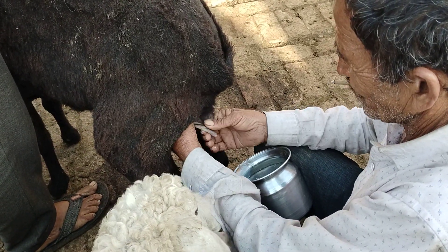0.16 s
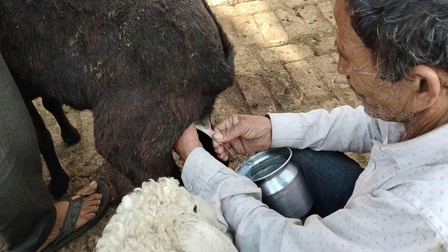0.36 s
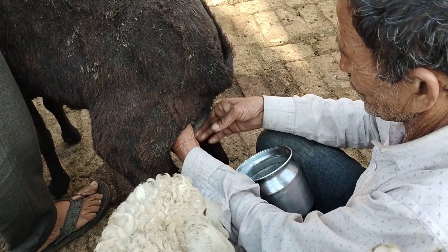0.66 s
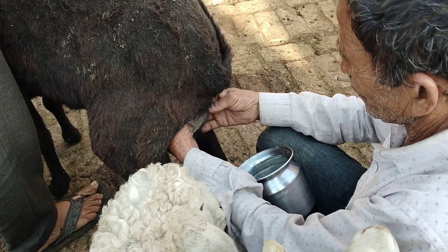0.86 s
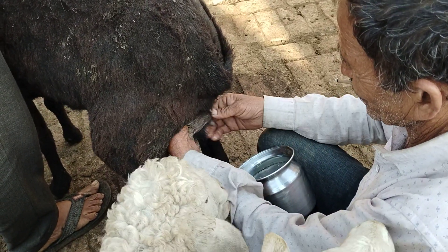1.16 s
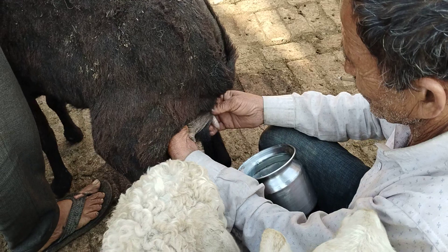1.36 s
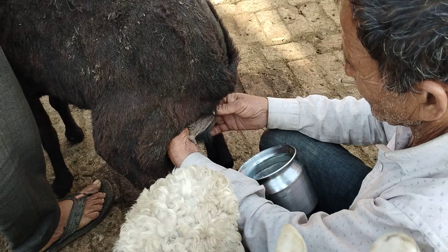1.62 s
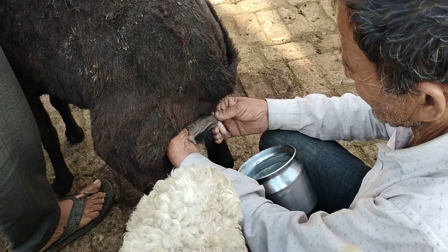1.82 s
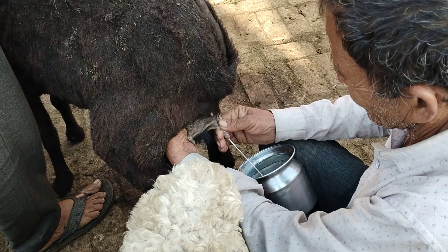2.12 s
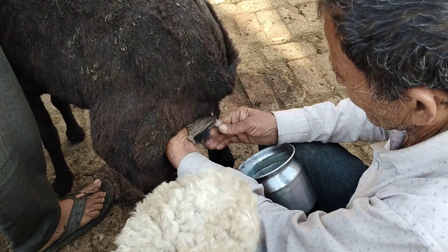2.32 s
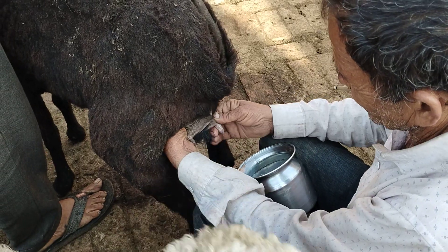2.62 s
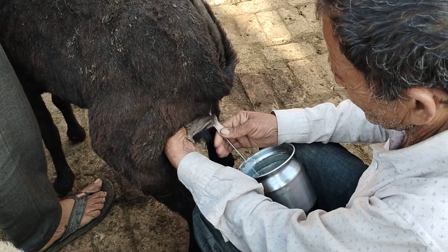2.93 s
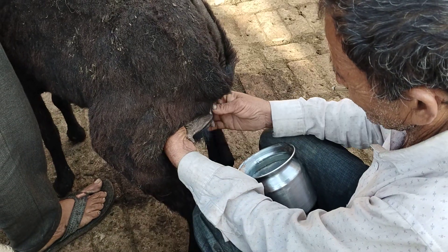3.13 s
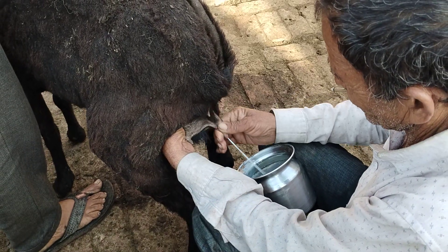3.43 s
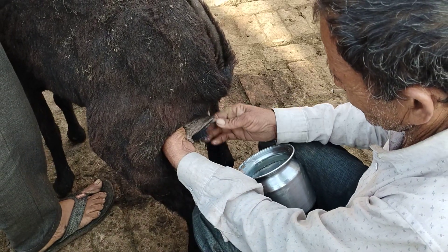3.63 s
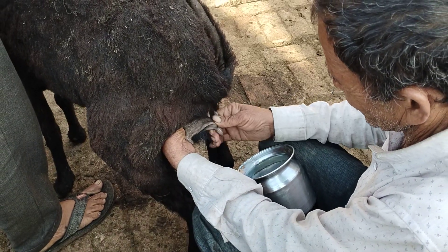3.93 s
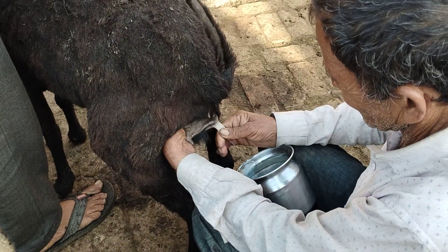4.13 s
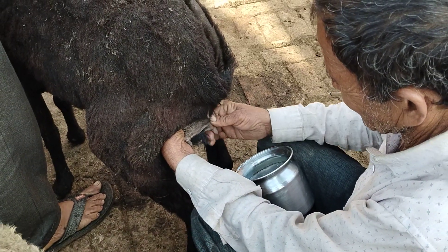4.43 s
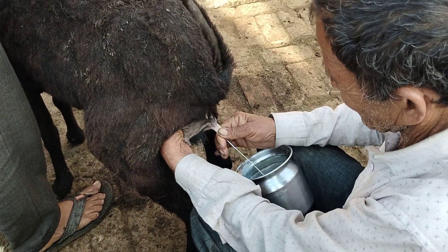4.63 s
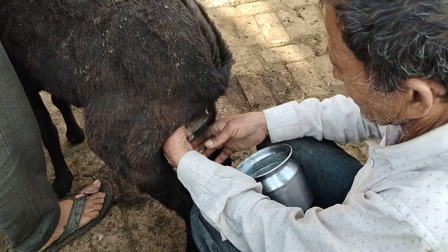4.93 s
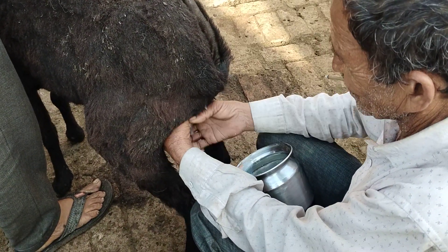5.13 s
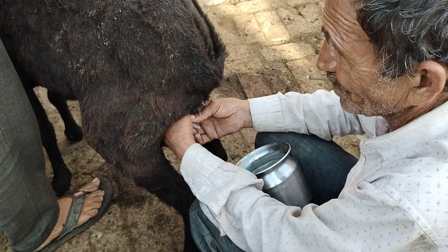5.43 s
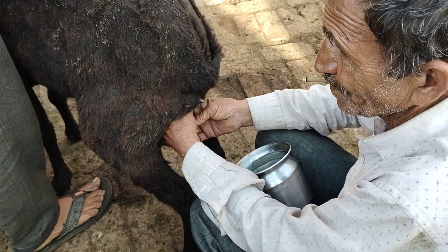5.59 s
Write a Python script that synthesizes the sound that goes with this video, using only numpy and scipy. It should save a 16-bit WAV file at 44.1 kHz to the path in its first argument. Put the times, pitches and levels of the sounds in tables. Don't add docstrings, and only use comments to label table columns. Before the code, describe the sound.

A quiet farmyard under uneven, buffeting breeze. A dry bird rattle, thin whistles and soft distant dove coos come first, among cloth movements and tiny knocks. Milk then spurts into a metal can with short hissing pings. A nearby sheep on the left murmurs with mouth shut and bursts into a single hoarse, nasal, wavering bleat with a short wall echo. Dove, faint chirp and rustling finish the scene.

```python
import sys
import numpy as np
from scipy import signal
from scipy.fft import rfft, irfft, next_fast_len
from scipy.io import wavfile

SR = 44100
rng = np.random.default_rng(int(sys.argv[2]) if len(sys.argv) > 2 else 0)


def volts_from_decibels(level):
    exponent = np.asarray(level, float) / 20
    return 10 ** exponent


def master_out(mix):
    frames = np.transpose(np.atleast_2d(mix))
    ceiling = np.clip(frames, -1, 1)
    pcm = np.round(ceiling * 32767).astype(np.int16)
    wavfile.write(sys.argv[1], SR, pcm)


N = 254012
T = np.arange(N) / SR
F = np.maximum(np.fft.rfftfreq(next_fast_len(N), 1 / SR), 1)

# (frequency [Hz], left lead [rad])
PORT_PHASE = [(60, -.1), (200, -.4), (400, -1.1), (800, -2), (1400, -2.6), (3000, -2), (15000, -1.6)]
# (frequency [Hz], level [dB])
MIC_COLOUR = [(6500, -2), (7800, 3), (8700, 0), (9500, -15), (10300, -10), (12000, -9.5)]

VOICE = slice(int(4.08 * SR), int(5.07 * SR))
OPENS_S, ATTACK_S = 4.36, 0.013


def on_log(table):
    hz, value = np.transpose(table)
    return np.interp(np.log(F), np.log(hz), value)


def columns(table, t=T):
    s, *rest = np.transpose(table)
    return [np.interp(t, s, c) for c in rest]


def bell(t, s, half):
    return np.exp(-((t - s) / half) ** 2)


def shape(x, gain):
    return irfft(rfft(x, next_fast_len(N)) * gain, next_fast_len(N))[:N]


def unit(x, t0=0, t1=6):
    return x / np.std(x[int(t0 * SR):int(t1 * SR)])


def modes(table, f=F):
    total = 0
    for k, (hz, width, db) in enumerate(table):
        detune = (f / hz - hz / f) * hz / width
        total = total + (-1) ** k * volts_from_decibels(db) / (1 + 1j * detune) ** 2
    return total


def band(hz, width):
    return unit(shape(rng.standard_normal(N), modes([(hz, width, 0)])))


def walk(rate):
    return unit(shape(rng.standard_normal(N), (F > 1) / (1 + (F / rate) ** 2)))


def patchy(hz, width):
    total = 0
    for f in hz + width * np.linspace(-.4, .4, 4):
        flicker = volts_from_decibels(3 * walk(200) + 3 * walk(30))
        total = total + flicker * np.array([band(f, width / 3), band(f, width / 3)])
    return total / 2


def ports(mid, pan_db, phase):
    right = volts_from_decibels(-pan_db) * np.exp(-1j * phase)
    return np.array([shape(mid, 2 / (1 + right)), shape(mid, 2 * right / (1 + right))])


def panned(mid, pan_db):
    return mid * volts_from_decibels(np.array([[pan_db / 2], [-pan_db / 2]])) / np.cosh(pan_db / 17.4)


def echo(x, t60, db):
    t = np.arange(int(SR * .6)) / SR
    tail = rng.standard_normal((2, len(t))) * 1000 ** (-t / t60) * (t > .004)
    tail = tail / np.sqrt(np.sum(tail[0] ** 2))
    return x + volts_from_decibels(db) * signal.fftconvolve(x, tail, axes=1)[:, :N]


def add(out, s, grain):
    i = int(s * SR)
    out[:, i:i + grain.shape[1]] += grain[:, :N - i]


def ring(hz, t60):
    t = np.arange(int(SR * .04)) / SR
    return np.sin(2 * np.pi * hz * t) * 1000 ** (-t / t60) * np.minimum(1, t / 0.00043)


def whistles(notes, rough, pan_db, glide, peak, rise_db, fall_db, droop_hz=0, edge_s=0.013):
    out = np.zeros((2, N))
    flutter = volts_from_decibels(rough * walk(51))
    for s, length, from_hz, to_hz, db in notes:
        t = np.arange(0, length, 1 / SR)
        settled = (1 - np.exp(-t / length / glide)) / (1 - np.exp(-1 / glide))
        hz = from_hz + (to_hz - from_hz) * settled - droop_hz * (t / length) ** 5
        level = volts_from_decibels(db - np.interp(t / length, [0, peak, 1], [rise_db, 0, fall_db]))
        edge = np.minimum(1, np.minimum(t, t[-1] - t) / edge_s)
        tone = np.sqrt(2) * np.sin(2 * np.pi * np.cumsum(hz) / SR)
        add(out, s, panned(edge * level * tone, pan_db))
    return out * flutter


def yard():
    # (frequency [Hz], density [dB per Hz])
    floor_colour = [(15, -22), (25, -1), (59, -6), (96, -5.5), (148, -11.5), (421, -40), (598, -23.5),
                    (1170, -25), (2920, -26.5), (4500, -37), (7910, -35), (8810, -39.5), (9550, -40),
                    (11200, -44), (15500, -43.5)]
    shared = np.clip(on_log([(60, 1.0), (300, 0.8), (1400, 0.04), (4000, 0.09)]), 0, 1)
    right_gain = volts_from_decibels(-on_log([(100, 1.3), (1000, 3.5), (2500, 9.8), (5000, 5.3)]))
    colour = volts_from_decibels(on_log(floor_colour) - on_log(MIC_COLOUR))
    turn = np.exp(-1j * on_log(PORT_PHASE))
    edges_hz = [0, 150, 400, 900, 1800, 3000, 4500, 7000, SR]
    out = 0
    for lo, hi in zip(edges_hz[:-1], edges_hz[1:]):
        part = colour * (F >= lo) * (F < hi)
        a, b = rng.standard_normal((2, N))
        right = shape(a, part * np.sqrt(shared) * turn) + shape(b, part * np.sqrt(1 - shared))
        flicker = volts_from_decibels(.9 * walk(2) + .9 * walk(15))
        out = out + flicker * np.array([shape(a, part), shape(right, right_gain)])
    return volts_from_decibels(-51.5) * out / np.std(out.mean(axis=0))


def breeze():
    # (time [s], level [dB])
    gusts = [(0, -31.5), (.18, -113), (.5, -48), (1.28, -36.5), (1.5, -86), (1.8, -38), (2.1, -36),
             (2.42, -45), (2.7, -41.5), (3.1, -44), (3.4, -48), (3.7, -44.5), (4.25, -44), (4.7, -49.5),
             (5.05, -48.5), (5.4, -40.5), (5.76, -54)]
    # (time [s], level [dB], half length [s])
    upper_swells = [(0.181, -40.5, 0.077), (0.334, -47, .05), (0.414, -47.5, 0.045), (2.69, -60, 0.066),
                    (0.554, -48.5, 0.16), (1.13, -47.5, 0.15), (3.114, -58.5, 0.14), (5.428, -46.5, 0.072),
                    (5.7, -60.5, 0.15)]
    # (time [s], level [dB], frequency [Hz], half length [s])
    port_booms = [(0.47, -43, 80.3, 0.15), (0.625, -37.5, 87, 0.026), (0.892, -32.5, 112.3, 0.062),
                  (1.216, -41.5, 88.4, 0.21), (1.435, -36, 66, 0.031), (2.046, -28.5, 71.1, 0.098),
                  (2.239, -32, 71, 0.024), (2.39, -39, 62.1, 0.086), (3.067, -37, 66, 0.045),
                  (3.516, -39, 114.7, 0.059), (3.724, -42, 50, 0.088), (6.2, -41, 60, 0.029),
                  (5.747, -40.5, 61, 0.041), (1.25, -45.5, 190, 0.078), (2.4, -44.5, 140, 0.069),
                  (0.101, -43.5, 200, .015), (0.149, -40.5, 230, .02), (.2, -40, 190, 0.014),
                  (0.313, -41.5, 170, 0.016), (5.64, -52, 262, 0.054), (5.595, -50.5, 280, .012),
                  (5.445, -47.5, 310, 0.018), (0.85, -39, 73, .012), (.01, -39.5, 92, 0.017),
                  (5.345, -49, 280, .01)]
    upper = volts_from_decibels(-52.5 - 0.26 * T) + sum(volts_from_decibels(db) * bell(T, s, half) for s, db, half in upper_swells)
    rumble = 0.72 * volts_from_decibels(columns(gusts)[0]) * band(83.4, 47.6)
    rumble = rumble + upper * volts_from_decibels(2.0 * walk(5.2)) * (band(129.0, 130) + 0.18 * band(228, 344))
    drift = 0.81 * walk(7.8)
    for s, db, hz, half in port_booms:
        rumble = rumble + volts_from_decibels(db) * np.sqrt(2) * bell(T, s, half) * np.sin(2 * np.pi * hz * T + drift)
    return ports(rumble, 0 * F + .5, on_log(PORT_PHASE))


def rustle():
    # (time [s], rise [s], fall [s], level [dB], body relative to level [dB])
    hiss_bursts = [(.56, 0.14, 0.066, -60, -5), (.85, 0.11, 0.22, -74.5, 7.5),
                   (1.12, 0.036, 0.066, -69, -9), (1.43, 0.018, 0.074, -75, 5),
                   (1.9, 0.066, 0.068, -70, -25), (2.21, 0.017, 0.044, -58, -30),
                   (2.33, 0.081, 0.097, -61.5, 9), (2.62, 0.11, 0.23, -71, -9), (5.08, .05, 0.09, -72, 3),
                   (2.99, 0.023, 0.07, -57, -5.5), (3.13, 0.023, 0.011, -67.5, 10.5),
                   (3.619, 0.02, 0.19, -57.5, 5.5), (4.24, 0.032, 0.058, -59, 5.5),
                   (5.33, 0.096, 0.17, -65.5, 6.5)]
    grain = volts_from_decibels(5.2 * walk(60))
    port, top, body = (patchy(hz, w) for hz, w in [(7840, 8100), (12100, 7800), (4220, 5270)])
    levels = np.zeros((3, N))
    for s, rise, fall, db, body_db in hiss_bursts:
        top_db = 1.5 + 0.51 * min(body_db, 0)
        swell = bell(T, s, np.where(T < s, rise, fall))
        levels += volts_from_decibels(db + np.array([[0], [top_db], [body_db]])) * swell
    out = levels[0] * port + levels[1] * top + levels[2] * body
    rim = band(5540, 220) + 1.1 * band(6170, 300) + 0.4 * band(4320, 300) + 0.48 * band(8200, 350)
    jet = volts_from_decibels(-54.0) * bell(T, 2.215, 0.028) * rim
    # (time [s], level [dB], half length [s])
    drags = [(.4, -56.5, 0.19), (.8, -57, 0.15), (2.35, -74, 0.075), (3.72, -54.5, 0.13),
             (5.47, -52, 0.14)]
    drag = sum(volts_from_decibels(db) * bell(T, s, half) for s, db, half in drags)
    return out + grain * jet + drag * np.array([band(2100, 2400), 0.13 * band(1400, 1600)])


def dove():
    # (time [s], length [s], from [Hz], to [Hz], level [dB])
    opening_coo = [
        (0.555, 0.11, 549.5, 568.5, -48.5),
    ]
    later_coos = [
        (0.76, 0.45, 559.4, 521, -49.5),
        (1.54, 0.16, 566, 500, -53),
        (4.87, 0.45, 570, 540, -48),
        (5.675, 0.12, 551, 490, -60),
    ]
    rising = whistles(opening_coo, rough=0.65, pan_db=-7.5, glide=9.5, peak=0.52, rise_db=11, fall_db=7.2)
    falling = whistles(later_coos, rough=0.63, pan_db=-7.0, glide=8.1, peak=0.17, rise_db=11.7, fall_db=26)
    return rising + falling


def chirps():
    # (time [s], level [dB], top [Hz], length [s])
    chirp_notes = [
        (0.355, -51.5, 6300, 0.026),
        (0.467, -52.5, 4980, 0.023),
        (2.512, -55.5, 5260, 0.03),
        (2.63, -55, 4590, 0.027),
        (5.153, -58, 5200, 0.031),
    ]
    # (time [s], length [s], level [dB])
    buzz_notes = [
        (0.45, 0.14, -70),
        (1.883, 0.24, -71.5),
        (4.187, 0.21, -69),
    ]
    upper_hz, lower_hz = 4200, 3530
    out = np.zeros((2, N))
    for s, db, top_hz, length in chirp_notes:
        t = np.arange(0, length, 1 / SR)
        upper = np.interp(t, [0, .009, .019, length], [2800, top_hz, upper_hz * 1.02, upper_hz])
        lower = np.interp(t, [0, .008, length], [2800, lower_hz, lower_hz * 1.19])
        a_level = np.interp(t, [0, .012, .025, length], [0.74, 0.45, 2.1, 5.1])
        b_level = np.interp(t, [0, .004, .013, .022], [0, 1.58, 0.98, 0])
        a = a_level * np.sin(2 * np.pi * np.cumsum(upper) / SR)
        b = b_level * np.sin(2 * np.pi * np.cumsum(lower) / SR)
        add(out, s, panned(volts_from_decibels(db) * (a + b) * np.minimum(1, (t[-1] - t) / 0.0036), 10.2))
    arch = 0
    for s, length, db in buzz_notes:
        arch = arch + volts_from_decibels(db) * np.sin(np.pi * np.clip((T - s) / length, 0, 1)) ** 0.53
    return out + panned(arch * (band(6060, 760) + 0.65 * band(5400, 570)), 2.4)


def birdsong():
    # (time [s], length [s], from [Hz], to [Hz], level [dB])
    slides = [
        (0.34, 0.18, 4930, 5630, -60.5),
        (1.795, 0.16, 4930, 5680, -60.5),
        (4.075, 0.19, 5010, 5660, -58.5),
    ]
    pipes = [
        (1.285, 0.23, 1704, 2384, -59),
    ]
    upper_pipes = [
        (1.305, .2, 2206, 2617, -57),
        (1.32, 0.17, 2780, 2910, -72),
    ]
    peeps = [(0.0, 0.04, 4300, 4330, -78), (0.0, 0.04, 3080, 3120, -79), (0.09, .05, 3480, 3330, -73),
             (0.095, 0.055, 3150, 3300, -73), (.865, 0.06, 3960, 3970, -75), (1.19, 0.09, 3060, 2650, -81),
             (3.522, 0.03, 2950, 3450, -68), (3.56, .025, 3350, 3600, -70), (3.82, .03, 3400, 3500, -77),
             (5.03, .1, 2600, 2750, -70), (5.71, 0.05, 3930, 3750, -75)]
    late_pipes = [
        (3.55, .145, 1700, 2250, -63.5),
        (3.545, 0.089, 2550, 3010, -70),
        (3.553, .13, 2050, 2590, -63),
    ]
    late_ends = [
        (3.705, .105, 2250, 2270, -63),
        (3.68, .1, 2630, 2470, -61.5),
    ]
    song = whistles(slides, rough=1.5, pan_db=4.9, glide=.5, peak=0.62, rise_db=8.6, fall_db=6.1)
    song += whistles(pipes, rough=3.4, pan_db=9.3, glide=0.21, peak=0.8, rise_db=11.4, fall_db=7.2)
    song += whistles(upper_pipes, rough=1.4, pan_db=11.7, glide=.12, peak=0.55, rise_db=11, fall_db=4,
                     droop_hz=220)
    song += whistles(peeps, rough=4.0, pan_db=17.0, glide=0.76, peak=0.2, rise_db=2.4, fall_db=3.4)
    song += whistles(late_pipes, rough=1.6, pan_db=7.4, glide=.13, peak=0.43, rise_db=7.4, fall_db=0.6,
                     edge_s=.008)
    song += whistles(late_ends, rough=3.0, pan_db=7.7, glide=3.5, peak=.4, rise_db=1.5, fall_db=4.4,
                     edge_s=0.0074)
    return song + chirps()


def rattle():
    # (time [s], peak [dB])
    rattle_pulses = [(0.133, -52.5), (0.16, -55.5), (0.2441, -46), (0.303, -52), (0.325, -46.5),
                     (0.347, -41.5), (0.381, -40), (0.401, -36), (0.4184, -40), (0.432, -45.5),
                     (0.4583, -36), (0.486, -40), (0.508, -35.5), (0.5278, -35.5), (0.586, -44.5),
                     (0.607, -50), (0.632, -47)]
    out = np.zeros((2, N))
    tunings = 1 + .03 * rng.standard_normal((len(rattle_pulses), 3))
    for (s, db), tune in zip(rattle_pulses, tunings):
        upper = volts_from_decibels(14 - 44 * s) * (ring(2330 * tune[1], .013) + .5 * ring(2750, .006))
        pulse = ring(1200 * tune[0], .013) + upper + .6 * ring(1600 * tune[2], .006)
        add(out, s - .002, panned(volts_from_decibels(db) * pulse, 7.0))
    return out


def knocks_and_ticks():
    # (time [s], peak [dB], frequency [Hz])
    dull_knocks = [(0.068, -49, 840), (.243, -60, 2630), (1.071, -51, 1950), (1.415, -49, 3020),
                   (2.999, -71, 2100), (1.137, -39, 2800), (1.14, -37, 1170), (1.143, -44.5, 3100),
                   (1.855, -47, 765), (1.954, -47, 800), (2.286, -52, 3500), (2.3, -60, 4200),
                   (2.331, -50, 1510), (2.345, -48, 3640), (2.362, -40.5, 765), (2.372, -55, 3440),
                   (2.39, -43.5, 1010), (2.43, -40.5, 900), (2.841, -45, 1160), (3.128, -51.5, 3020),
                   (5.337, -48, 333), (5.391, -46.5, 1120), (5.431, -51, 500), (5.405, -46, 1250),
                   (5.432, -49, 910), (5.47, -52, 620), (5.627, -54, 1900), (5.63, -52.5, 1000),
                   (3.692, -45, 4200), (3.693, -53, 3800), (2.968, -55, 4180), (3.135, -56, 3200),
                   (.1, -47.5, 800), (2.69, -55, 380), (3.32, -50, 320), (3.27, -54, 400), (.415, -57, 330),
                   (.19, -48, 600), (.31, -52, 700), (.525, -44, 420), (2.44, -48, 550)]
    bright_ticks = [(0.072, -53, 5740), (.002, -50.5, 6060), (5.752, -52, 2950), (0.164, -50.5, 11200),
                    (.176, -54, 9900), (.742, -57, 8540), (.91, -51.5, 8100), (1.048, -52, 11100),
                    (1.415, -49, 10800), (2.495, -54, 8500), (3.04, -49, 6500), (0.678, -43.5, 9100),
                    (1.1005, -35.5, 7480), (1.138, -47, 6800), (1.226, -49.5, 7600), (1.443, -47.5, 5300),
                    (2.176, -54, 5600), (2.209, -40.5, 7300), (2.2842, -42, 5730), (2.403, -40, 5470),
                    (2.854, -50.5, 7900), (2.9659, -40.5, 5700), (3.135, -52, 5300), (3.6013, -40, 7550),
                    (3.692, -43, 5170), (4.1, -50, 8540), (4.227, -42, 6030)]
    out = np.zeros((2, N))
    for s, db, hz in dull_knocks:
        add(out, s, panned(volts_from_decibels(db) * ring(hz, 0.013), 2.0))
    for s, db, hz in bright_ticks:
        crack = np.diff(rng.standard_normal((2, 1765))) * 1000 ** (-np.arange(1764) / SR / .02)
        add(out, s, volts_from_decibels(db) * (.5 * ring(hz, 0.0078) + 0.3 * crack))
    return out


def milk_can():
    # (time [s], length [s], from [Hz], to [Hz], level [dB])
    can_glides = [
        (2.262, 0.059, 1456, 1543, -52),
        (2.315, 0.06, 1497, 1388, -60),
        (3.6, 0.05, 1400, 1790, -58),
        (5.18, 0.041, 2650, 2530, -64),
    ]
    can_notes = [
        (2.992, .024, 2090, 2130, -46.5),
        (3.012, 0.038, 2110, 2140, -53),
        (3.05, .03, 2130, 2120, -71),
        (3.086, 0.018, 2080, 2110, -54),
        (3.032, 0.017, 1540, 1580, -53),
        (3.7, 0.02, 1560, 1000, -67),
        (3.085, 0.024, 1560, 1460, -56.5),
        (2.972, .018, 1650, 1780, -63),
    ]
    glides = whistles(can_glides, rough=2.5, pan_db=-1.3, glide=1.6, peak=0.62, rise_db=5, fall_db=7)
    return glides + whistles(can_notes, rough=1.3, pan_db=-1.4, glide=1.7, peak=0.44, rise_db=3.7,
                             fall_db=6.1, edge_s=0.0085)


def throat_quaver(t):
    # (time [s], pitch drop [share], level drop [dB], half length [s], lip drop [dB])
    slackenings = [
        (4.173, .1, 0, .022, 2),
        (4.422, 0.03216, 1.5, 0.01617, -3.5),
        (4.505, 0.056, 0, 0.019, -1.5),
        (4.586, 0.079, 2.5, 0.025, 4),
        (4.659, 0.077, 3, 0.01586, 1),
        (4.714, 0.039, 4, 0.00904, -3),
        (4.76, 0.0331, 2.5, 0.0182, -1.5),
        (4.837, 0.023, 1.5, 0.0197, -1.5),
        (4.901, 0.012, 2, .018, 0),
    ]
    pitch_drop, level_drop_db, lip_drop_db = 0, 0, 0
    for s, pitch, level, half, lip in slackenings:
        slack = bell(t, s, half)
        pitch_drop = pitch_drop + pitch * slack
        level_drop_db = level_drop_db + level * slack
        lip_drop_db = lip_drop_db + lip * slack
    return 1 - pitch_drop, volts_from_decibels(-level_drop_db), lip_drop_db


def glottis(t, pitch_share):
    # (time [s], pitch [Hz])
    bleat_pitch = [
        (4.08, 152.1),
        (4.2, 159.9),
        (4.32, 187.3),
        (4.39, 209.5),
        (4.47, 215.1),
        (4.62, 220),
        (4.7, 213.9),
        (4.92, 200.5),
        (4.97, 180.3),
    ]
    k = np.arange(1, 29)[:, None]
    hz = columns(bleat_pitch, t)[0] * pitch_share
    phase = 2 * np.pi * np.cumsum(hz * (1 + .003 * walk(60)[VOICE])) / SR
    wobble = np.array([walk(32)[VOICE] for _ in range(7)])[np.arange(28) % 7]
    waver_db = 1.8 * wobble * (k > 8) + .9 * wobble * (k > 3) + .5 * walk(110)[VOICE]
    tones = np.exp(1j * (k * phase - .2 * k ** 2 + .009 * k * wobble[::-1])) * volts_from_decibels(waver_db)
    creak = 0.13 * np.clip((t - 4.92) / ATTACK_S, 0, 1)
    tones = tones * (1 + creak * np.cos(phase / 2))
    harmonic_hz = (k * hz)[:, ::8]
    return phase, wobble, tones, harmonic_hz


def through(tones, response):
    gain = np.repeat(response, 8, axis=1)[:, :tones.shape[1]]
    power = np.median(np.sum(abs(response) ** 2, axis=0)) / 2
    return np.real(np.sum(tones * gain, axis=0)) / np.sqrt(power)


def air(gated, table):
    return unit(shape(gated, modes(table)), 4.96, 5.12)[VOICE]


def nose(t, phase, shut, first):
    # (time [s], half length [s], level [dB])
    octave_swells = [
        (4.6, 0.095, 12.4),
        (4.92, 0.098, 16.7),
    ]
    octave_db = -25.5 + 7.2 * shut + 4.3 * first
    octave_db = octave_db + sum(db * bell(t, s, half) for s, half, db in octave_swells)
    return np.sqrt(2) * (np.cos(phase) + volts_from_decibels(octave_db) * np.cos(2 * phase))


def cheek(t, tones, harmonic_hz, gated, hoarse):
    # (frequency [Hz], width [Hz], level [dB])
    cheek_modes = [(640, 315, 6), (812, 870, -3.5), (970, 434, 0.5)]
    widen = 0.915 + 0.33 * (t[::8] - OPENS_S)
    notch_hz, notch_width_hz = 428, 200
    detune = (harmonic_hz / notch_hz - notch_hz / harmonic_hz) * notch_hz / notch_width_hz
    notch = 1 - 1 / (1 + 1j * detune)
    voiced = through(tones, notch * modes(cheek_modes, harmonic_hz / widen))
    return voiced + 0.84 * hoarse * air(gated, cheek_modes)


def mouth(t, tones, harmonic_hz, gated, hoarse, lip_drop_db, lip_shift):
    # (frequency [Hz], width [Hz], level [dB])
    mouth_modes = [(1459, 280, -7), (1727, 154, 5.5)]
    lip_modes = [(2310, 388, 0.53), (2852, 210, -0.73)]
    teeth_modes = [(3336, 200, -14.5), (3728, 157, -12.5), (4660, 1900, -37), (5520, 520, -30.5)]
    slow = t[::8]
    gape = np.clip((slow - 4.91) / 0.05, 0, 1)
    stretch = 1.002 - .04 * bell(slow, 4.39, .03) + 0.12 * gape
    lip_gain = volts_from_decibels(-1.5 + 7.5 * gape - lip_drop_db[::8])
    teeth_gain = np.clip((slow - OPENS_S) / 0.049 + 0.35, 0, 1) * (1 + 0.34 * bell(slow, 4.73, 0.084))
    teeth = teeth_gain * modes(teeth_modes, harmonic_hz / np.sqrt(stretch))
    lower_lip = modes(lip_modes[:1], harmonic_hz / stretch)
    upper_lip = lip_shift[::8] * modes(lip_modes[1:], harmonic_hz / stretch)
    response = modes(mouth_modes, harmonic_hz) + teeth + lip_gain * (lower_lip - upper_lip)
    return through(tones, response) + hoarse * air(gated, mouth_modes + lip_modes + teeth_modes)


def sheep_breath(t, mouth_db, dip, phase, waver):
    gate = np.minimum((t - OPENS_S) / 0.059, (5.01 + 0.018 - t) / 0.04)
    blow = np.clip(gate, 0, 1) * volts_from_decibels(-49 + 0.25 * mouth_db)
    puff = blow * dip * volts_from_decibels(2.5) * (1 + .45 * np.cos(phase)) * volts_from_decibels(1.8 * waver)
    breath = np.zeros((2, N))
    for port, db in enumerate((1.5, -1.5)):
        grows = np.clip((T - OPENS_S) / 0.39, .3, 1)
        hiss = band(5350, 170) * 1.3 * grows * volts_from_decibels(1.2 * walk(9.2))
        hiss += band(5100, 3600) * 1.56 + band(6480, 2400)
        top = band(11300, 2600) + 0.42 * band(14000, 2500)
        hiss += top * volts_from_decibels(2.0 * db - 3.0 + 1.2 * walk(25))
        breath[port, VOICE] = volts_from_decibels(db) * puff * hiss[VOICE]
    return breath


def sheep():
    # (time [s], open mouth [dB])
    bleat_effort = [
        (4.33, -56.5),
        (4.36, -27.5),
        (4.385, -21.5),
        (4.54, -20),
        (4.62, -17.5),
        (4.74, -21.5),
        (4.87, -22.5),
        (4.965, -31.5),
        (5.015, -54),
    ]
    # (time [s], half length [s], nose [dB], grunt [dB])
    shut_hums = [
        (4.152, 0.029, -30, -48),
        (4.196, 0.012, -37, -58),
        (4.223, 0.013, -36, -51),
        (4.261, 0.016, -32, -48),
        (4.321, 0.045, -33, -50),
    ]
    # (time [s], half length [s], cheek [dB], upper lip resonance [dB])
    jaw_shifts = [(4.4, .02, -2.5, 5.5), (4.438, 0.013, 3.5, 0.5), (4.47, .02, -5, -4),
                  (4.522, 0.019, 0.5, -3.5), (4.563, 0.021, -7, -2.5), (4.628, 0.018, -3.5, -6),
                  (4.692, 0.014, -2, 3), (4.724, 0.022, 2.5, -2), (4.779, .015, 0.5, 4),
                  (4.807, 0.013, 1, 0), (4.855, 0.014, -2.5, 2)]
    # (frequency [Hz], width [Hz], level [dB])
    grunt_modes = [(1130, 630, 14.2), (1720, 610, 9.6), (2500, 920, 5), (3500, 340, 2.5)]
    first_grunt_modes = [(980, 1070, 6), (2090, 390, 11.5), (2960, 580, -2)]
    # (frequency [Hz], left lead [rad])
    sheep_pan = [(60, -10), (110, -3), (200, 3), (380, 10), (700, 0.5), (1290, 10), (2380, 13.5),
                 (4400, 17.5), (8120, 2.5), (15000, 28)]
    sheep_phase = [(60, 0), (250, -1), (600, -2.4), (1800, -2.6), (2150, -1.2), (3200, -2.5), (4200, -1.5)]
    t = T[VOICE]
    mouth_db = columns(bleat_effort, t)[0]
    pitch_share, dip, lip_drop_db = throat_quaver(t)
    phase, wobble, tones, harmonic_hz = glottis(t, pitch_share)
    gated = np.zeros(N)
    gated[VOICE] = (1 + 0.38 * np.cos(phase)) * rng.standard_normal(len(t))

    held = np.clip(np.minimum((t - OPENS_S) / ATTACK_S, 1 - (t - 4.97) / 0.07), 0, 1)
    nose_gain = held * volts_from_decibels(-28.5 - 20.5 * (t - OPENS_S))
    cheek_gain = held ** 2 * volts_from_decibels(-32.5 - 14 * abs(t - 4.5))
    for s, half, nose_db, grunt_db in shut_hums:
        hum = np.exp(-abs((t - s) / half) ** 3)
        nose_gain = nose_gain + volts_from_decibels(nose_db) * hum
        cheek_gain = cheek_gain + volts_from_decibels(grunt_db) * hum
    cheek_gain = cheek_gain * volts_from_decibels(sum(db * bell(t, s, half) for s, half, db, _ in jaw_shifts))
    lip_shift = volts_from_decibels(sum(db * bell(t, s, half) for s, half, _, db in jaw_shifts))

    shut = np.interp(t, [4.325, 4.375], [1, 0])
    first = np.interp(t, [4.17, 4.2], [1, 0])
    hoarse = np.interp(t, [4.42, 4.56, 4.7, 4.74, 4.91, 4.94], [.1, .27, .27, .1, .1, .4])

    def grunt(table):
        voiced = .9 * shut * through(tones, modes(table, harmonic_hz))
        return (.08 + .3 * shut) * air(gated, table) + voiced

    in_cheek = (1 - shut) * cheek(t, tones, harmonic_hz, gated, hoarse)
    in_cheek = in_cheek + first * grunt(first_grunt_modes) + (1 - first) * grunt(grunt_modes)
    in_mouth = (1 - shut) * mouth(t, tones, harmonic_hz, gated, hoarse, lip_drop_db, lip_shift)
    in_mouth = in_mouth + shut * np.clip((t - 4.2) / 0.024, 0, 1) * air(gated, grunt_modes)
    nose_gain = nose_gain * dip ** 0.88 * np.interp(t, [4.36, 4.4], [1, 1.25])
    voice = np.zeros(N)
    voice[VOICE] = volts_from_decibels(mouth_db) * dip * in_mouth + cheek_gain * in_cheek
    voice[VOICE] += nose_gain * nose(t, phase, shut, first)
    voice *= np.interp(T, [5.0, 5.06], [1, 0])
    placed = ports(voice, on_log(sheep_pan), on_log(sheep_phase))
    return echo(placed + sheep_breath(t, mouth_db, dip, phase, wobble[0]), .3, -16)


def scene():
    near = milk_can() + rattle() + knocks_and_ticks()
    small = echo(birdsong(), 0.21, -2.1) + echo(dove(), 0.95, -15.5) + echo(near, 0.065, -9.0)
    small[1] = shape(small[1], np.exp(-1j * on_log(PORT_PHASE)))
    return yard() + breeze() + rustle() + volts_from_decibels(11.0) * small + sheep()


def roll_off(x):
    return signal.sosfilt(signal.butter(12, 15700, fs=SR, output="sos"), x)


def record(dry):
    low_cut_hz, top_hz = 23.7, 15700
    response = volts_from_decibels(on_log(MIC_COLOUR)) * (F < top_hz) / (1 + (low_cut_hz / F) ** 4)
    coloured = np.array([shape(c, response) for c in dry])
    rounded = np.tanh(.3 * coloured) / .3
    return roll_off(rounded)


dry = scene()
out = record(dry)
master_out(out)
```